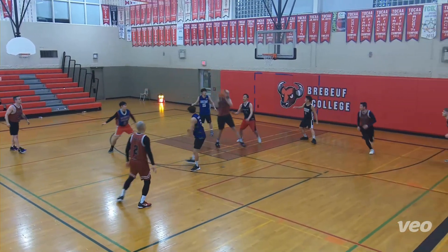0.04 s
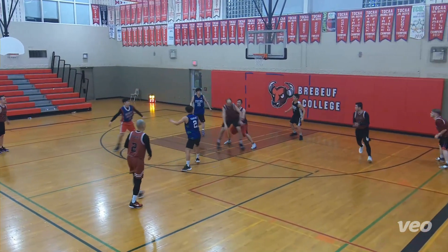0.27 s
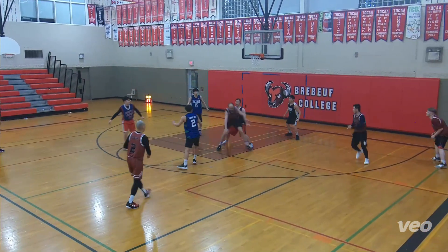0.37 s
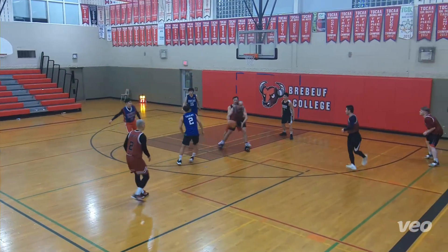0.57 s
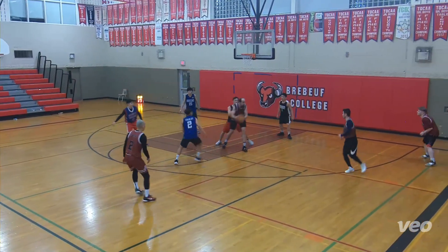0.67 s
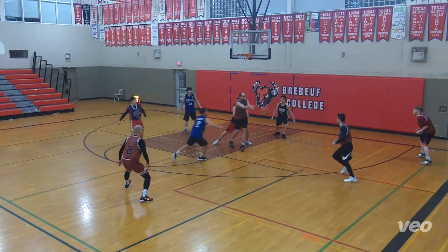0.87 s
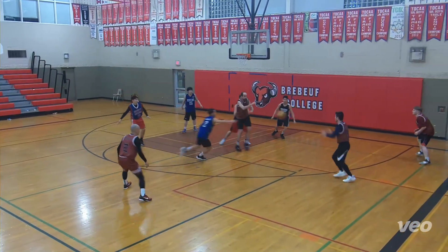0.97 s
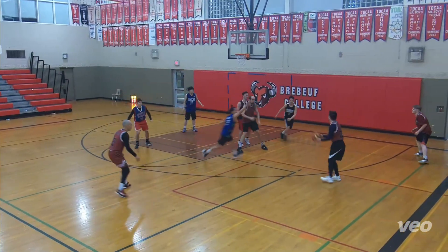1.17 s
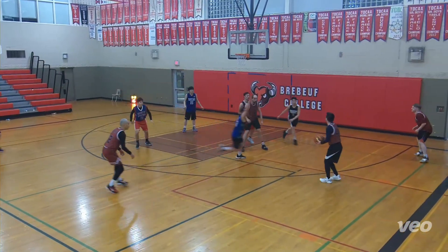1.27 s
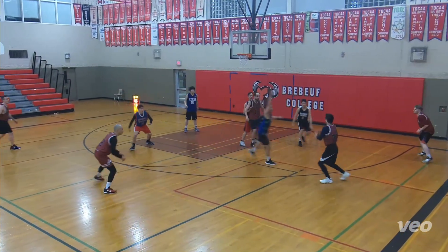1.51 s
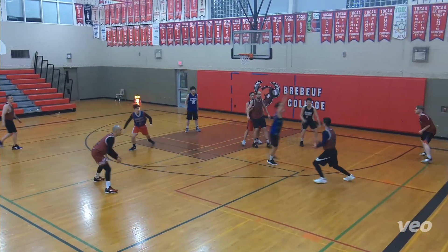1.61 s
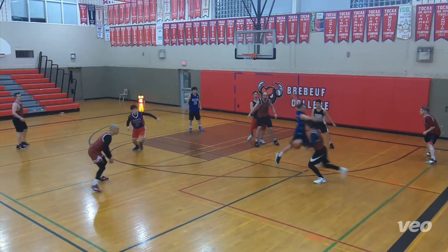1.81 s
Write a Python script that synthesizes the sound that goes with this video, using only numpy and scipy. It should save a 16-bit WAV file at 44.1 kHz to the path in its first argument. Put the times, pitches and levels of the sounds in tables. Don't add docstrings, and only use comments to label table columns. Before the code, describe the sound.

Sneakers squeak and feet thud around a sharp basketball slap in a large echoing school gym

```python
import sys
import numpy as np
from scipy import signal
from scipy.fft import rfft, irfft
from scipy.io import wavfile
from scipy.ndimage import uniform_filter1d, minimum_filter1d

SR = 44100
rng = np.random.default_rng(int(sys.argv[2]) if len(sys.argv) > 2 else 0)


def gain_from_db(level_db):
    decades = np.asarray(level_db, float) / 20
    return 10 ** decades


def transcribe(signal):
    frames = np.atleast_2d(signal).T
    limited = np.clip(frames, -1, 1)
    pcm = np.round(limited * 32767).astype(np.int16)
    wavfile.write(sys.argv[1], SR, pcm)


N = 81585
RUN_IN = SR // 5
TONE_TOP_HZ = 9880


def at_hz(points, hz):
    table_hz, value = np.array(points).T[:2]
    return np.interp(np.log(hz), np.log(table_hz), value)


def rms_one(x):
    return x / np.sqrt(np.mean(x ** 2) + 1e-20)


def drift(rate_hz, size):
    r = np.exp(-2 * np.pi * rate_hz / SR)
    white = rng.standard_normal(size + 4000)
    return rms_one(signal.lfilter([1], [1, -2 * r, r * r], white)[4000:])


def lagged(pair):
    lag_samples = 18
    return np.array([np.roll(pair[0], lag_samples), pair[1]])


def split_db(db):
    return np.array([[.5], [-.5]]) * db


def panned(x, db):
    return x * gain_from_db(split_db(db))


# (frequency [Hz], correlation)
LIKENESS = [(60, 0.87), (250, 0.86), (1000, 0.53), (4000, 0.098), (10000, 0.46)]


def bands(gain, size):
    out = 0
    edges_hz = 35 * 2 ** np.arange(0, 9, .5)
    white = rng.standard_normal((2, 2, size))
    for k, (low, high) in enumerate(zip(edges_hz, edges_hz[1:])):
        band = signal.butter(2, [low, high], "band", fs=SR, output="sos")
        mid, side = signal.sosfilt(band, white[k % 2])
        hz = np.sqrt(low * high)
        alike = np.clip(at_hz(LIKENESS, hz), -1, 1)
        pair = np.sqrt(1 + alike) * mid + np.sqrt(1 - alike) * side * [[1], [-1]]
        out = out + gain(hz) * pair
    return lagged(out)


# (frequency [Hz], density [dB per Hz])
AIR_SPECTRUM = [(18, -65), (30, -13), (189, 4.5), (650, -3.5), (935, -3.5), (1140, -4.5), (3380, -13),
                (5100, -15.5), (9800, -10.5), (12700, -79), (21600, -120)]


def ventilation(t):
    def gain(hz):
        return gain_from_db(at_hz(AIR_SPECTRUM, hz) + 3.3 * drift(13.0, len(t)))
    return gain_from_db(-44) * rms_one(bands(gain, len(t)))


# (frequency [Hz], t60 [s])
HALL_T60 = [(100, 1.21), (300, 1.1), (1000, 1.6), (4000, 1.545), (10000, 0.29)]
# (frequency [Hz], level [dB])
HALL_LEVEL = [(100, 3.5), (300, 6.5), (1000, 7), (4000, -0.37), (8500, 8.5), (10000, -11.5)]
# (frequency [Hz], left-right [dB])
HALL_PAN = [(200, 1.5), (1000, -2), (4000, 0), (10000, -4)]


def hall(x):
    gap_s, rise_s, lumpy_db = .006, .012, 2.4
    age = np.arange(2 * SR) / SR - gap_s

    def gain(hz):
        decay_db = at_hz(HALL_LEVEL, hz) - 60 * age / at_hz(HALL_T60, hz)
        return gain_from_db(decay_db + split_db(at_hz(HALL_PAN, hz)))

    lumps = gain_from_db(lumpy_db * drift(26.7, len(age)))
    build_up = np.clip(age / rise_s, 0, 1) ** .5
    tail = bands(gain, len(age)) * lumps * build_up
    tail = tail / np.sqrt(np.sum(tail ** 2) / 2)
    return signal.fftconvolve(tail, x[None], axes=1)[:, :len(x)]


def ring(clicks, hz, t60_s):
    r, w = gain_from_db(-60 / (t60_s * SR)), 2 * np.pi * hz / SR
    return signal.lfilter([0, np.sin(w)], [1, -2 * r * np.cos(w), r * r], clicks + 1e-18)


# (time [s], level [dB])
THUDS = [
    (.086, -33.5),
    (0.238, -44),
    (.371, -17),
    (0.431, -28.5),
    (0.647, -28),
    (1.114, -32.5),
    (1.171, -31.5),
    (1.273, -25),
    (1.518, -32),
    (1.715, -36.5),
]
# (frequency [Hz], level [dB], t60 [s])
BOARDS = [(121.3, -11, 0.065), (191.2, 4, 0.044), (261, 1.5, 0.021), (427.4, -4.5, 0.035),
          (584, -51, 0.014)]


def thuds(t):
    time_s, db = np.transpose(THUDS)
    at = (time_s * SR).astype(int) + RUN_IN
    spread_db = rng.normal(0, 1.5, (len(at), len(BOARDS)))
    out = 0
    for k, (hz, mode_db, t60_s) in enumerate(BOARDS):
        clicks = np.zeros(len(t))
        clicks[at] = gain_from_db(db + mode_db - 7.5 + spread_db[:, k])
        out = out + ring(clicks, hz, t60_s)
    return out


# (time [s], pitch [Hz], level [dB], left-right [dB])
KNOCKS = [(.3025, 765, -11, -5), (0.3, 1270, -16, -19), (0.3, 980, -22.5, 16), (0.302, 2090, -14, -3),
          (0.368, 1188, -27, 24), (.372, 634, -21.5, 1.5), (0.32, 380, -25, 2), (.40, 530, -30, 11),
          (0.519, 523, -23, 5.5), (0.71, 409, -30.5, 14), (1.1, 1790, -14, -2.5),
          (1.107, 1420, -16.5, -3.5), (1.165, 1012, -24.5, -16.5), (1.168, 622, -29, -3),
          (1.274, 728, -28.5, 3), (1.275, 526, -32.5, -1), (1.272, 184.5, -29, 1), (.315, 290, -28, -2),
          (.44, 463, -23.5, 2)]


def knocks(t):
    rise_s, t60_cycles = .0027, 15.3
    out = 0
    for s, hz, db, pan_db in KNOCKS:
        age = np.maximum(t - s, 0)
        shape = gain_from_db(db - 60 * age * hz / t60_cycles) * np.clip(age / rise_s, 0, 1)
        out = out + panned(shape * np.sin(2 * np.pi * hz * age), pan_db)
    return out


# (time [s], crack [dB], left-right [dB], ping over crack [dB], ping pitch [Hz])
SLAPS = [(0.0888, -49.5, -13, 10, 10040), (0.3024, -19, -15.5, -1.5, 9950), (0.3048, -20.5, -14, -18, 9800),
         (.3685, -17, -6, 5, 9850), (.381, -33, -6, 7, 10000), (.388, -34, -6, 8, 10100),
         (0.401, -26.5, -4, -16, 10000), (.631, -46.5, -9.5, 9, 10250), (1, -43, -8, -16, 10020),
         (1.275, -43, 6, -22, 10000), (1.686, -43, -5, -21, 10000)]
# (frequency [Hz], density [dB per Hz])
CRACK_SPECTRUM = [(300, -50.5), (700, 4), (1500, 2), (2400, 1), (3500, 5.5), (6000, 2), (8500, 3.5),
                  (12000, 2.5)]


def slaps(t):
    t60_s, rise_s, ping_width_hz = .024, .0007, 800
    size = len(t)
    hz = np.maximum(np.fft.rfftfreq(size, 1 / SR), 1)
    white = rfft(rng.standard_normal((2, size)))
    noise = rms_one(irfft(white[0] * gain_from_db(at_hz(CRACK_SPECTRUM, hz)), size))
    out, far = np.zeros((2, size)), 0
    for s, crack_db, pan_db, ping_db, ping_hz in SLAPS:
        ping_band = np.exp(-((hz - ping_hz) / ping_width_hz) ** 2)
        ping = rms_one(irfft(white[1] * ping_band, size))
        age = np.maximum(t - s, 0)
        shape = gain_from_db(crack_db - 60 * age / t60_s) * np.clip(age / rise_s, 0, 1)
        out += panned(shape * (noise + gain_from_db(ping_db) * ping), pan_db)
        far = far + shape * noise
    return out, far


# (time [s], length [s], pitch [Hz], level [dB], overtone level [dB])
SQUEAKS = [(-.1, .03, 3713, -32.5, -36), (-.05, .023, 3470, -35.5, -24), (.19, .022, 4765, -43, -14),
           (.204, .012, 4740, -28.5, -20), (.216, .033, 4850, -38, -11), (.227, .008, 4680, -35, -15),
           (.24, .012, 3500, -40, -22), (.2495, .0095, 3480, -19, -16), (.335, .012, 5620, -27, -22),
           (.364, .008, 3400, -26, -20), (.676, .014, 4170, -26, -15), (.729, .021, 4190, -30.5, -12),
           (1.014, .06, 6150, -44, -9), (1.022, .012, 5780, -31, -12), (1.033, .013, 5600, -31, -15),
           (1.037, .03, 5350, -43, -9), (1.049, .055, 5600, -41, -9), (1.075, .05, 5950, -43, -9),
           (1.09, .012, 9450, -42, -9), (1.093, .014, 3780, -43, -3), (1.105, .021, 3830, -30, -6),
           (1.116, .012, 3110, -25, -1), (1.149, .035, 3216, -28.5, -3), (1.165, .015, 5500, -38, -9),
           (1.17, .09, 3580, -43, -9), (1.196, .026, 3225, -36, -10), (1.243, .044, 3215, -35, -7),
           (1.322, .015, 3210, -43, -12), (1.34, .035, 3200, -44, -3), (1.404, .02, 3220, -46, -10),
           (1.453, .03, 3240, -41, -10), (1.461, .03, 3740, -35, -7), (1.543, .025, 3245, -45, -10),
           (1.62, .03, 3235, -47, -10), (1.649, .11, 9510, -46, -12)]


def squeaks(t):
    grip_s, release_s = .0045, .006
    sag_per_s, pitch_wobble = .5, .019
    wobble = drift(450, len(t))
    flutter = gain_from_db(3.0 * drift(200, len(t)))
    highpass = signal.butter(2, 4670, "high", fs=SR, output="sos")
    hiss = signal.sosfilt(highpass, rng.standard_normal(len(t)))
    out = 0
    for s, length, hz, db, overtone_db in SQUEAKS:
        shape = np.clip(np.minimum((t - s) / grip_s, (s + length - t) / release_s), 0, 1)
        sag = sag_per_s * np.clip(t - s - length / 2, -length, length)
        own_wobble = pitch_wobble * np.roll(wobble, int(hz))
        phase = 2 * np.pi * np.cumsum(hz * (1 - sag + own_wobble)) / SR
        tone = 0
        for k, partial_db in enumerate((0, overtone_db, overtone_db - 2.5), start=1):
            if k * hz < TONE_TOP_HZ:
                tone = tone + gain_from_db(partial_db) * np.sin(k * phase)
        out = out + shape * (gain_from_db(db) * tone + gain_from_db(db + overtone_db - 12.5) * hiss)
    lowpass = signal.ellip(10, .5, 50, TONE_TOP_HZ, fs=SR, output="sos")
    return signal.sosfilt(lowpass, out * flutter)


def scene():
    t = (np.arange(N + RUN_IN) - RUN_IN) / SR
    sole = squeaks(t)
    ball, crack = slaps(t)
    shell, feet = knocks(t), thuds(t)
    direct = lagged(panned(sole, -10.5) + ball + shell + feet)
    send = gain_from_db(.5) * sole + gain_from_db(6.5) * crack + gain_from_db(-6) * shell.mean(axis=0) + gain_from_db(1.5) * feet
    return (direct + hall(send) + ventilation(t))[:, RUN_IN:]


def burst_gated(x):
    top_hz, burst_db, hold = 10800, 7, 600
    hz, bins = np.fft.rfftfreq(N, 1 / SR), rfft(x)
    top = irfft(bins * (hz > TONE_TOP_HZ) * (hz < top_hz), N)
    power = top ** 2
    sudden = uniform_filter1d(power, size=200) > gain_from_db(burst_db) ** 2 * uniform_filter1d(power, size=3000)
    held = uniform_filter1d(sudden * 1., size=hold, origin=hold // 4) > 1e-6
    return irfft(bins * (hz <= TONE_TOP_HZ), N) + top * uniform_filter1d(held * 1., size=150)


def treble_lapse(x):
    lapse_s, length_s, from_hz = .378, .0035, 2000
    hz = np.fft.rfftfreq(N, 1 / SR)
    treble = irfft(rfft(x) * (hz > from_hz), N)
    distance_s = abs(np.arange(N) / SR - lapse_s)
    return x - treble * np.clip(2 - 4 * distance_s / length_s, 0, .9) ** .3


def masked(x):
    mask_db, chance_db, loss_db, patch_db, from_hz = 18, 6.5, -25, 2.2, 900
    hz, _, cells = signal.stft(x, SR, nperseg=1536)
    band = np.arange(len(hz)) // 4
    power = np.add.reduceat(np.mean(abs(cells) ** 2, axis=0), np.arange(0, len(hz), 4))
    loudest = -minimum_filter1d(-power, size=11, axis=0)
    luck = uniform_filter1d(rng.standard_normal((2, *power.shape)), size=4, axis=2) * 2
    lost = power < loudest * gain_from_db(2 * (chance_db * luck[0] - mask_db))
    gain_db = np.where(lost, loss_db, patch_db * luck[1])[band]
    gain_db[(hz < from_hz) | (hz > TONE_TOP_HZ - 300)] = 0
    return signal.istft(cells * gain_from_db(gain_db), SR, nperseg=1536)[1][:, :N]


def sway():
    lowpass = signal.butter(2, 45, fs=SR, output="sos")
    slow = signal.sosfilt(lowpass, rng.standard_normal(N))
    return gain_from_db(-64) * rms_one(slow) * np.array([[.75], [-1]])


def low_pass(x):
    return signal.sosfilt(signal.butter(12, 11800, fs=SR, output="sos"), x)


def record(dry):
    rumble_cut = signal.butter(4, 126, "high", fs=SR, output="sos")
    x = signal.sosfilt(rumble_cut, dry)
    x = treble_lapse(burst_gated(x))
    mix = sway() + masked(x)
    return low_pass(mix)


dry = scene()
out = record(dry)
transcribe(out)
```